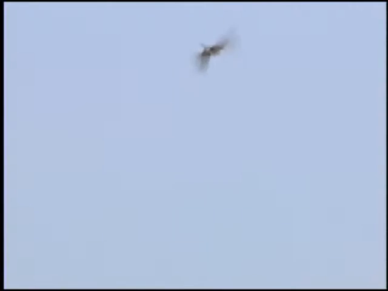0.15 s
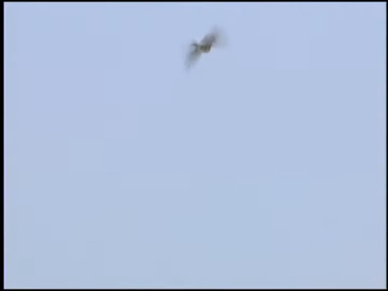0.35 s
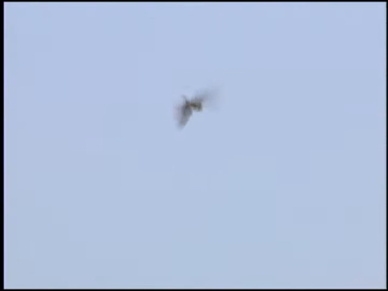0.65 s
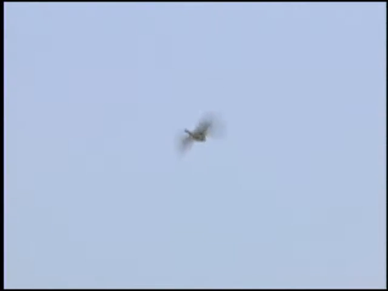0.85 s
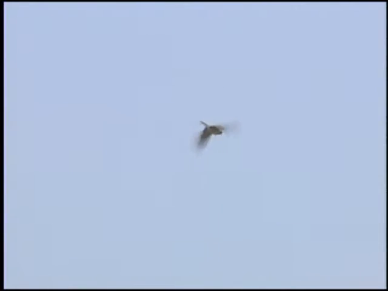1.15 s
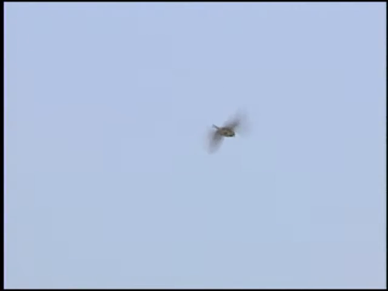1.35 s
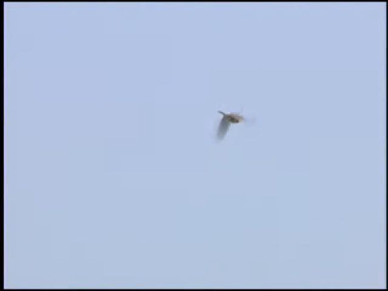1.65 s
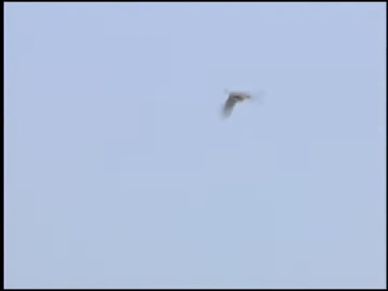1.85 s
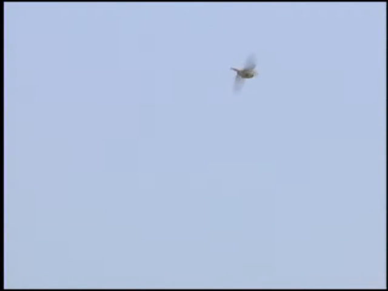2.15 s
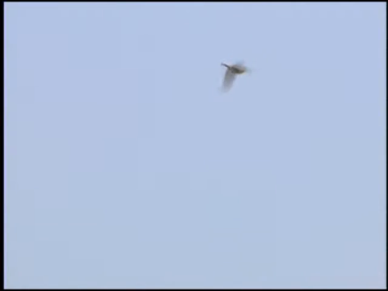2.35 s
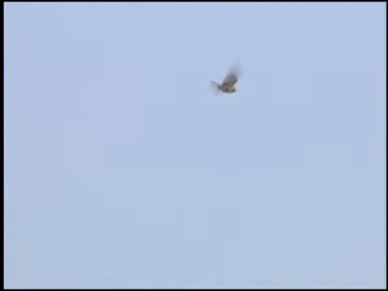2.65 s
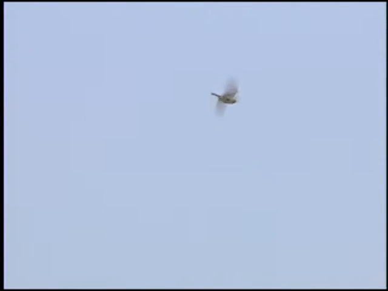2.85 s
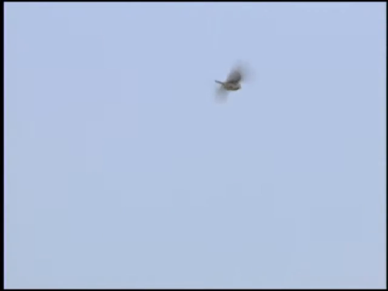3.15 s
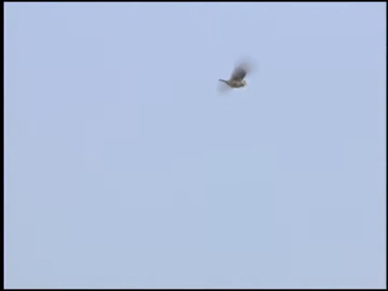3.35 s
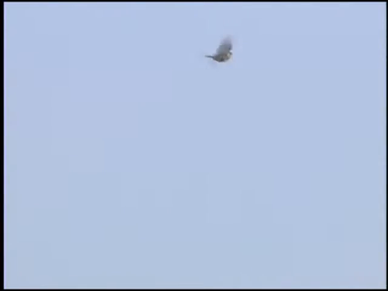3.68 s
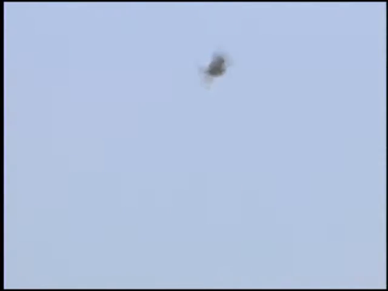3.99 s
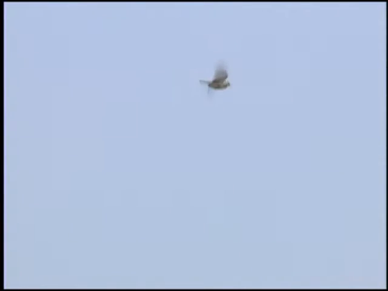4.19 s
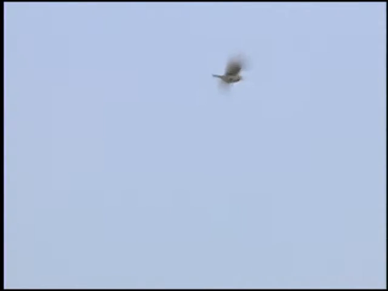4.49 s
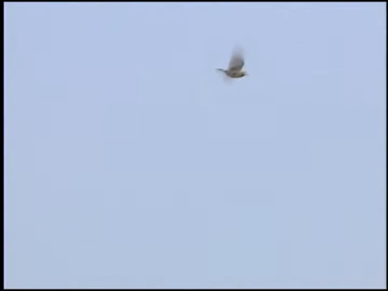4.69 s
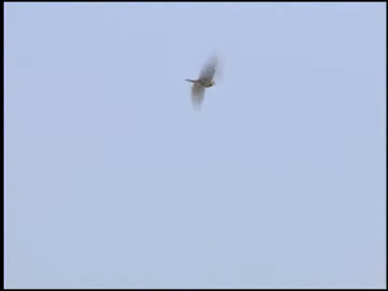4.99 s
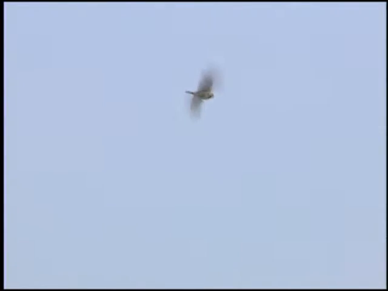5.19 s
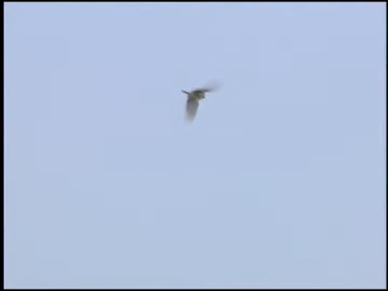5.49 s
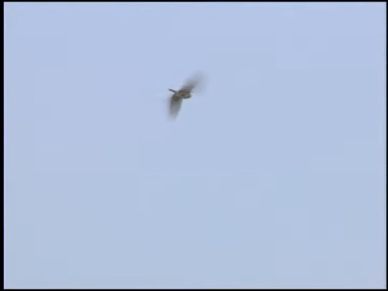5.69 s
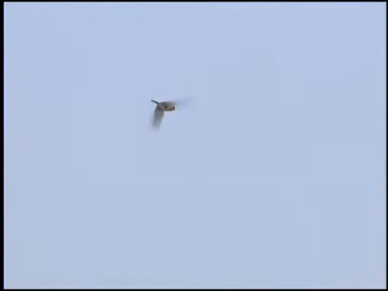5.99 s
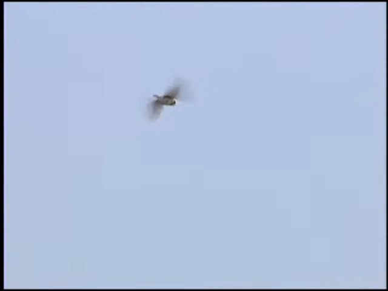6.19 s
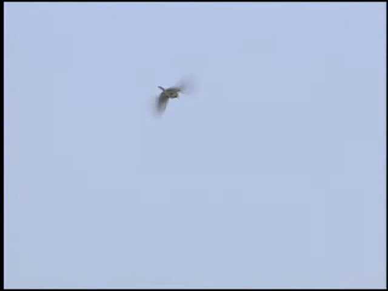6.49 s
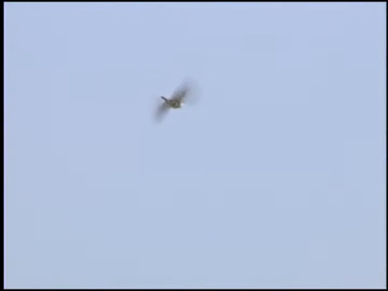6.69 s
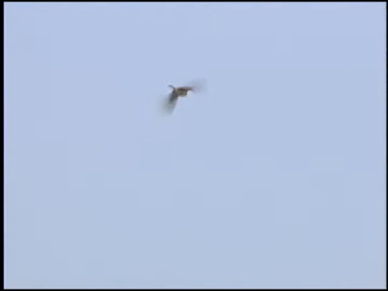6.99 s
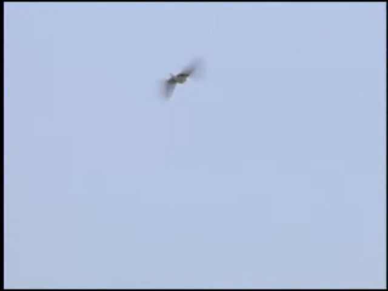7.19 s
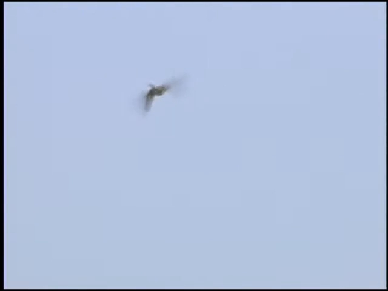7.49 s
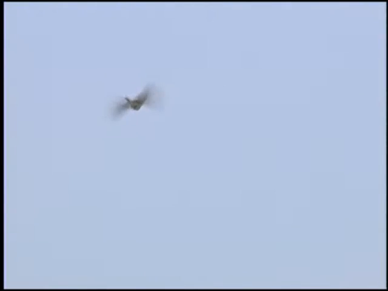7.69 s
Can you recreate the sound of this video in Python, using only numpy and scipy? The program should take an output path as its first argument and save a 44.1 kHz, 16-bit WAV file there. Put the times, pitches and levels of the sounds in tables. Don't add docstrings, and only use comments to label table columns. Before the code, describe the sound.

A lark in flight sings almost without pause: first a phrase of whistled slides, short trills and buzz, sung twice, then quick swooping phrases with pips and long rattling trills, repeated about every 0.7 seconds. Low wind rumbles against the camera microphone, swelling near five and seven seconds. Faint dull bangs roll far away, a second lark is barely audible, and soft hiss fills the open field.

```python
import sys
import numpy as np
from scipy import signal
from scipy.io import wavfile
from scipy.ndimage import uniform_filter1d

SR = 44100
rng = np.random.default_rng(int(sys.argv[2]) if len(sys.argv) > 2 else 0)


def voltage_ratio(level):
    return 10 ** (np.asarray(level, float) / 20)


def wrap_up_sound(samples):
    columns = np.atleast_2d(samples).T
    tamed = np.clip(columns, -1, 1)
    steps = np.round(tamed * 32767).astype(np.int16)
    wavfile.write(sys.argv[1], SR, steps)


N = 345744

# pitch_hz, level_db, width_hz, flutter_db
SCAN_LINES = [
    (7867, -99.5, 4, 1),
    (15201, -108, 30, 2),
    (15724, -85.5, 15, 4.6),
]
# frequency_hz, level_db
FIELD_SPECTRUM = [(60, -18.5), (140, -4.5), (250, -10), (400, -13), (750, -19), (1100, -24), (1600, -30),
                  (2200, -36), (3300, -40.5), (5000, -41.5), (6300, -46), (7200, -47.5), (11000, -49.5),
                  (16000, -45.5)]
# time_s, rumble_db
GUSTS = [(0.0, -39), (0.08, -45), (0.83, -39), (1.05, -50.5), (1.42, -40), (1.46, -47), (1.9, -40.5),
         (2.1, -48.5), (3.7, -52.5), (4.6, -42.5), (4.78, -35), (4.92, -41), (5.05, -31), (5.15, -43),
         (6.74, -33.5), (6.9, -45.5), (7.18, -39.5), (7.84, -36)]
# frequency_hz, level_db
RUMBLE_SPECTRUM = [(8, -19), (20, -3), (40, -4), (75, -4), (110, -12.5), (160, -20), (250, -34),
                   (400, -47.5), (900, -110)]
# middle_s, width_s, level_db
CROP_GUST = (7.31, 0.32, 4)
# pitch_hz, level_db, start_s, end_s
MACHINE = (754, -83.5, 2, 4.4)
# start_s, peak_db, time_to_fall_60_db_s, low_edge_hz, high_edge_hz
BANGS = [(.61, -68, 0.16, 400, 1750), (0.758, -56.5, 0.046, 400, 1980), (.995, -60, 0.057, 400, 1960),
         (1.195, -59.5, 0.041, 500, 2560), (1.452, -61, 0.11, 400, 1460), (2.143, -62.5, 0.15, 1200, 2630),
         (2.685, -72, 0.23, 900, 2760), (3.108, -59, 0.33, 450, 2220), (3.561, -55.5, 0.23, 450, 2240),
         (4.798, -67.5, 0.09, 2200, 3180), (4.996, -65, 1, 500, 1400), (5.385, -63, 0.15, 500, 2580),
         (5.983, -62.5, 0.33, 500, 2300), (6.461, -62.5, 0.3, 800, 2430), (4.65, -60, 0.17, 450, 790)]
# start_s, peak_db, pitch_hz, time_to_fall_60_db_s
KNOCKS = [(.762, -72, 1700, 0.027), (.997, -56, 700, .04), (1.013, -63, 750, .04), (1.197, -66, 810, .03),
          (1.455, -59, 696, .04), (3.109, -68, 1850, .03), (3.124, -62, 1140, .04),
          (3.561, -69, 1500, 0.036), (3.576, -62, 930, .04), (4.8, -73, 2770, .05),
          (5.977, -61, 2390, 0.054), (5.99, -71, 2320, .04), (6.121, -62, 1150, .04),
          (6.473, -66, 1690, .04), (6.493, -63.5, 1300, 0.047)]

# start_s, length_s, start_hz, end_hz, level_db
FAR_SLIDES = [(0.118, 0.019, 2090, 2900, -76.5), (.14, .14, 3270, 5500, -91),
              (0.917, .0093, 4460, 5170, -83), (1.204, .021, 2290, 2870, -78.5),
              (1.694, .03, 4200, 4920, -83), (1.725, .027, 6200, 4630, -85),
              (1.934, 0.015, 3170, 4130, -86), (3.592, .012, 4770, 4260, -78),
              (3.741, 0.013, 4960, 4300, -77), (4.715, 0.017, 5400, 4500, -77),
              (4.914, 0.02, 4350, 5000, -80), (4.972, .018, 2970, 3600, -81), (5.42, .022, 3500, 3000, -84),
              (5.885, .012, 5260, 4600, -85), (6.74, 0.054, 4300, 3800, -77),
              (1.105, .015, 5200, 4400, -89), (1.29, 0.0071, 4300, 4800, -85),
                (1.307, .008, 4700, 4000, -83), (1.315, 0.0091, 4500, 3800, -77),
                (1.675, .022, 3800, 4350, -87), (1.76, .045, 3100, 2750, -95),
                (1.945, .012, 4000, 2800, -90), (2.05, 0.034, 3850, 4700, -90),
                (2.549, 0.062, 3980, 3620, -88), (2.915, .04, 4010, 4400, -90),
                (3.365, 0.032, 3880, 4700, -93), (3.71, 0.016, 5150, 4850, -87),
                (4.72, 0.027, 2950, 3100, -89), (5.548, 0.018, 3400, 2890, -86),
                (5.615, .012, 5100, 4800, -83), (5.64, .12, 2550, 3200, -97), (5.845, .04, 5000, 3930, -85),
                (6.185, .02, 5000, 4500, -86), (6.4, .04, 4170, 4750, -89), (6.462, 0.047, 4200, 3880, -83),
                (6.835, 0.053, 2650, 2500, -85), (7.025, .03, 3200, 3500, -90),
                (7.232, .01, 4600, 4900, -82), (7.378, 0.018, 5200, 4370, -90),
                (7.408, .013, 4800, 5070, -85),
              (.497, .018, 2720, 2980, -86), (.578, .03, 3100, 2700, -87), (.678, .013, 4270, 4970, -83),
             (.7, .02, 3900, 3250, -87), (.889, .01, 5200, 4850, -87), (4.79, .01, 5000, 5500, -85),
             (4.802, .014, 5200, 4500, -84), (4.828, .01, 3800, 4500, -87), (4.846, .008, 3500, 4000, -88),
             (4.866, .008, 3100, 3500, -89), (4.954, .012, 3300, 3950, -85), (4.994, .01, 2900, 3500, -87),
             (5.002, 0.011, 4600, 4750, -78), (5.016, .01, 5000, 4900, -79)]
# start_s, length_s, top_hz, end_hz, level_db
FAR_ARCS = [(3.688, .014, 5200, 4700, -77), (0.77, 0.077, 4330, 4140, -83), (1.337, .03, 4000, 3500, -86),
            (4.934, .015, 4300, 4200, -81), (5.684, 0.018, 4300, 4200, -87),
            (5.743, 0.033, 4780, 4230, -81), (5.895, 0.026, 4330, 3850, -82.5),
            (6.213, 0.022, 2890, 2800, -84), (6.231, .024, 4600, 4370, -85), (7.216, 0.1, 3400, 3100, -84)]
# time_s, pitch_hz, level_db
FAR_CLIMB = [(0, 3150, -96), (.015, 3700, -88), (.03, 4150, -86), (.055, 4330, -87), (.08, 4330, -85),
             (.088, 4280, -95)]
FAR_WAIL = [(0, 3030, -91), (.015, 3200, -78), (.045, 3400, -81), (.06, 3410, -82), (.075, 3070, -82),
            (.115, 2570, -98)]
# start_s, level_change_db
FAR_WAILS = [
    (6.833, -1.5),
    (7.596, -1.5),
]

# time_s, pitch_hz, level_db
ARCH = [(.004, 5300, -87), (.007, 5390, -72), (.011, 5570, -68), (.017, 6030, -72.5), (.0225, 6900, -82.5)]
SWOOP = [(.037, 7140, -92), (.044, 6590, -71), (.06, 5410, -66.5), (.078, 4375, -64.5), (.088, 3970, -62.5),
         (.095, 3836, -66), (.098, 3760, -77)]
STEP_UP = [(.004, 5050, -82), (.008, 5280, -73), (.012, 5800, -73), (.017, 7060, -90)]
STEP_DOWN = [(.017, 7060, -87), (.024, 5600, -72.5), (.032, 5150, -66.5), (.047, 4870, -74),
             (.055, 4380, -64.5), (.064, 3650, -67.5), (.074, 3450, -65), (.1, 3370, -64.5),
             (.1035, 3420, -86)]
TENT = [(0.003, 3220, -78), (0.008, 3820, -62.5), (0.013, 4330, -73), (0.015, 4720, -75),
        (0.022, 4260, -61), (0.031, 3500, -66), (0.035, 3520, -84)]
SLIDE_DOWN = [(0.001, 5250, -76), (.005, 4860, -70), (0.01, 4500, -62.5), (0.018, 3750, -71)]
DOT = [(0.002, 3432, -79), (0.005, 3750, -64.5), (0.009, 3700, -73), (0.011, 3570, -93), (0.014, 2500, -88),
       (0.017, 2760, -72.5), (0.02, 2410, -86)]
PIP = [(.0015, 2700, -80), (.0033, 3150, -65), (.005, 3290, -61.5), (.0066, 3080, -65), (.0086, 2600, -79)]
HOOK = [(.004, 4250, -82), (.006, 4480, -70), (.011, 5000, -67), (.015, 5320, -68), (.0168, 5100, -79),
        (.0185, 4740, -66), (.022, 4420, -62.5), (.03, 3950, -61.5), (.034, 3880, -71)]
FALL = [(.029, 3050, -69), (.033, 3230, -63), (.0362, 3180, -67), (.038, 2780, -80), (.041, 2620, -69.5),
        (.045, 2530, -71), (.0468, 2330, -88), (.05, 2200, -76), (.056, 1900, -86)]
LEAD = [(.002, 5600, -85), (.006, 5270, -64.5), (.011, 4500, -68), (.0145, 3860, -69)]
# start_s, level_change_db
ARCH_TIMES = [(1.8983, -1), (2.033, -0.5), (2.6206, 0), (2.7506, 0.5), (3.333, 0.2), (3.464, 1.2),
              (4.0475, -1), (4.178, 0.9), (4.7745, 2.5), (4.906, 2.5), (5.495, -2), (5.63, -6.5),
              (6.234, -1.5), (6.366, -1), (6.9703, -1), (7.1015, 1.5), (7.7125, -2)]
STEP_TIMES = [
    (0.518, 4.8),
    (0.673, 5.1),
    (1.5978, 1),
    (1.7507, 1.1),
]
TENT_TIMES = [
    (0.0473, 0),
    (1.132, -5),
]
SLIDE_TIMES = [
    (0.291, -7),
    (1.374, -9),
]
DOT_TIMES = [
    (.234, 0.21),
    (1.3177, 0.4),
]
# start_s, level_change_db, pitch_share
CHIPS = [
    (0.829, -7, 0.92),
    (0.8375, -3.5, 0.93),
    (0.846, -7, 0.87),
    (0.866, -4, 0.99),
    (0.875, -7, .93),
]
# start_s, length_s, start_hz, end_hz, level_db
FLOURISH = [
    (.927, 0.013, 3600, 4700, -69.5),
    (0.938, 0.018, 4380, 3200, -70),
    (0.956, 0.0255, 2570, 3140, -73),
    (0.984, 0.0073, 4100, 3150, -69),
    (0.988, 0.019, 3950, 3600, -69),
    (1.009, 0.0096, 2800, 2400, -78),
]
# start_s, hook_db, pips_db, chup_db, gap_between_pips_s
CLOSES = [(2.17, 1, -0.5, -0.5, .0195), (2.885, 0.3, -1, 1, 0.018), (3.6, 0, 0, -1, .0208),
          (4.3145, 1.5, 0, 0.5, .0192), (5.041, 3.5, 2, 2, .0188), (5.768, -7, -4.5, -3, .019),
          (6.504, -3, -3, -1, .0188), (7.241, -1.5, 2, 2, .019)]
# lead_start_s, lead_db, trill_length_s, settled_beat_s, trill_db
LONG_TRILLS = [(2.347, 1.5, .1765, .01255, -1), (3.063, 2, .175, .01244, -.2),
               (3.7755, -3, .177, .0126, -2.5), (4.4933, -1, .185, .0126, 1.5),
               (5.218, -.5, .187, .01258, 0), (5.947, -9, .185, .0125, -6),
               (6.6825, -3.5, .19, .01253, -3.5), (7.4203, -5, .191, .0126, -2)]
TRILL_PITCH = [1.003, 1, 1, .995, .997, .989, .99, .974]
# share_of_beat, pitch_offset_hz, level_db
FLICK_BEAT = [(0, -820, -6.5), (.11, -820, -14), (.19, 800, -12.5), (.29, 360, -6), (.4, 20, -2),
              (.64, -30, 0), (.79, 320, -4), (.89, -520, -5), (1, -820, -6.5)]
SWING_BEAT = [(0, -850, -13), (.15, 1250, -24), (.24, 1000, -4), (.42, 130, -1.5), (.56, -20, 0),
              (.71, 280, -6), (.81, 1080, -.5), (.91, 1230, 1), (1, -850, -13)]
HOP_BEAT = [(0, -750, -15), (.3, -100, -3), (.5, 60, 0), (.7, -100, -3), (1, -750, -15)]
THROB_BEAT = [(0, -150, -22), (.5, 30, 0), (1, -150, -22)]
DIP_BEAT = [(0, -750, -7), (.25, -70, -1), (.5, 30, 0), (.75, -130, -1), (1, -750, -7)]
# share_of_length, pitch_hz, level_db, beat_depth (0 to 1)
LONG_CARRIER = [(0, 5500, -76, .05), (.014, 5260, -62, .1), (.032, 5020, -61, .3), (.048, 4780, -61, 1.05),
                (.13, 4610, -61, 1), (.4, 4520, -60, 1), (.9, 4420, -61, 1), (.98, 4400, -64, 1),
                (1, 4400, -74, 1)]
SHORT_CARRIER = [(0, 4800, -78, .1), (.06, 4450, -66, .3), (.14, 4250, -68, .8), (.9, 4050, -70, .8),
                 (1, 4050, -80, .8)]
WAVE_CARRIER = [(0, 4150, -82, .6), (.15, 4300, -72, 1), (.85, 4280, -69, 1), (1, 4400, -78, .9)]
BUZZ_CARRIER = [(0, 2950, -85, 0.77), (.2, 3010, -71, 0.93), (.8, 2910, -72, 0.92), (.92, 2660, -77, 0.5),
                (1, 2720, -67, 0.25)]
RISE_CARRIER = [(0, 3340, -96, .95), (.2, 3060, -69.5, 0.8), (.5, 3230, -68, 0.28), (.82, 3690, -68, 0.011),
                (.87, 3740, -77, 0.0082), (.93, 3060, -72, 0.0089), (1, 2790, -87, .01)]
CHUP_CARRIER = [(0, 3560, -66, .7), (.07, 3620, -62, .9), (.4, 3670, -62, .9), (.65, 3640, -62, .75),
                (.9, 3540, -62.5, .65), (1, 3350, -66, .65)]


def evened(x):
    return x / np.sqrt(np.mean(abs(x) ** 2) + 1e-20)


def read(points, hz):
    f, value = np.transpose(points)
    return np.interp(np.log(hz + 1), np.log(f + 1), value)


def add(mix, s, sound):
    start = round(s * SR)
    part = mix[max(start, 0):][:len(sound) + min(start, 0)]
    part += sound[max(-start, 0):][:len(part)]


def drift(count, size):
    once = uniform_filter1d(rng.standard_normal(count), size)
    return evened(uniform_filter1d(once, size))


def noise(level_db, patchy_db, size):
    frames = 4 * N // size + 5
    hz = np.fft.rfftfreq(size, 1 / SR)[:, None]
    t = np.arange(frames) * size / 4 / SR
    a, b, patches = rng.standard_normal((frames, len(hz), 3)).T
    patches = uniform_filter1d(patches, size=8, axis=0)
    patches = evened(uniform_filter1d(patches, size=6, axis=1))
    db = level_db(hz, t) + patchy_db * patches / (1 + (hz / 6000) ** 2)
    return signal.istft((a + 1j * b) * voltage_ratio(db), nperseg=size, noverlap=3 * size // 4)[1][:N]


def whistle(hz, db, flutter_db=1):
    count = len(hz)
    hz = uniform_filter1d(hz, size=20, mode="nearest") * (1 + .003 * drift(count, size=30))
    db = uniform_filter1d(db, size=20, mode="nearest") + flutter_db * drift(count, size=90)
    tone = np.sin(2 * np.pi * np.cumsum(hz) / SR)
    return np.sqrt(2) * voltage_ratio(db) * tone * signal.windows.tukey(count, min(80 / count, 1))


def slur(length, start_hz, middle_hz, end_hz, db, flutter_db):
    u = np.linspace(0, 1, round(length * SR))
    curve = np.polyval(np.polyfit([0, .5, 1], [start_hz, middle_hz, end_hz], 2), u)
    return whistle(curve, db + 0 * u, flutter_db) * signal.windows.tukey(len(u), .35)


def slide(length, start_hz, end_hz, db, flutter_db):
    midway = min(.6 + 3.5 * length, .84) if end_hz > start_hz else .5
    middle_hz = start_hz + midway * (end_hz - start_hz)
    return slur(length, start_hz, middle_hz, end_hz, db, flutter_db)


def syllable(shape, db, pitch=1):
    s, hz, level_db = np.transpose(shape)
    t = np.arange(s[0], s[-1], 1 / SR)
    level_db = 40 * np.log10(np.interp(t, s, voltage_ratio(level_db / 2)))
    sung = whistle(pitch * np.interp(t, s, hz), level_db + db, flutter_db=.6)
    return np.r_[np.zeros(round(s[0] * SR)), sung]


def trill(carrier, beat, length, db, beat_s, hurry_s=0, settle_s=.062, first=0, pitch=1, slur_share=1):
    t = np.arange(round(length * SR)) / SR
    share_of_length, *columns = np.transpose(carrier)
    hz, level_db, depth = (np.interp(t / length, share_of_length, c) for c in columns)
    beats = np.cumsum(1 / (beat_s - hurry_s * np.exp(-t / settle_s))) / SR
    share = (first + beats + .03 * drift(len(t), size=300)) % 1
    share_of_beat, *columns = np.transpose(beat)
    bend_hz, dip_db = (np.interp(share, share_of_beat, c) for c in columns)
    depth = depth * (1 + .1 * drift(len(t), size=250))
    apart = np.minimum(slur_share + t / settle_s / 4, 1)
    return whistle(pitch * hz + depth * bend_hz, level_db + db + depth * dip_db * apart, flutter_db=1.7)


def line_scan():
    out, t = np.zeros(N), np.arange(N) / SR
    for hz, db, width_hz, flutter_db in SCAN_LINES:
        flutter = np.minimum(drift(N, size=900), 1) + .1 * (t - 4)
        cycles = hz * t + np.cumsum(width_hz * drift(N, size=600)) / SR
        out += np.sqrt(2) * voltage_ratio(db + flutter_db * flutter) * np.cos(2 * np.pi * cycles)
    return out


def field():
    t = np.arange(N) / SR
    lag_s = .071
    gust_db = uniform_filter1d(np.interp(t, *np.transpose(GUSTS)), round(lag_s * SR), mode="nearest")
    machine = np.clip(np.minimum(t - MACHINE[2], MACHINE[3] - t) / .4 + 1, 0, 1)
    middle_s, width_s, crop_db = CROP_GUST
    db = .23 * (gust_db - gust_db.mean())
    db += 2.5 * machine
    db += crop_db * np.exp(-((t - middle_s) / width_s) ** 2)
    db -= db.mean()

    def swell(hz, s):
        return read(FIELD_SPECTRUM, hz) + np.interp(s, t, db) / (1 + (hz / 2700) ** 4)

    return voltage_ratio(-66) * evened(noise(swell, 2.1, size=1024))


def wind():
    s, rumble_db = np.transpose(GUSTS)

    def steady(hz, t):
        return read(RUMBLE_SPECTRUM, hz) + 0 * t

    def gusty(hz, t):
        gust_db = np.interp(t, s, rumble_db)
        reach = .14 * (gust_db + 41) * np.clip(np.log2(hz / 90 + .029), 0, 1)
        return read(RUMBLE_SPECTRUM, hz) + gust_db + reach

    rumble = noise(gusty, 1.25, size=2048) / np.std(noise(steady, 0, size=2048))
    return rumble * voltage_ratio(.63 * drift(N, size=900) + .4 * drift(N, size=3500))


def machine_hum():
    hz, db, start, end = MACHINE
    out, count = np.zeros(N), round((end - start) * SR)
    tone = whistle(np.full(count, hz * 1.), db + 2 * drift(count, size=5000))
    add(out, start, tone * signal.windows.tukey(count, .4))
    return out


def bangs():
    out, t = np.zeros(N), np.arange(SR // 2) / SR
    for s, db, t60, low_hz, high_hz in BANGS:
        band = signal.butter(3, [low_hz, high_hz], "band", fs=SR, output="sos")
        burst = evened(signal.sosfilt(band, rng.standard_normal(len(t))))
        fade = voltage_ratio(-60 * t / t60) + voltage_ratio(-10 - 60 * t / (4 * t60))
        shape = fade * np.minimum(t / .004, 1)
        shape = shape * voltage_ratio(2.2 * drift(len(t), size=200))
        add(out, s, voltage_ratio(db - 7) * burst * shape)
    return out


def knocks():
    out, t = np.zeros(N), np.arange(SR // 8) / SR
    for s, db, hz, t60 in KNOCKS:
        wobble = np.cumsum(1 + .08 * drift(len(t), size=60)) / SR
        level = voltage_ratio(db - 60 * t / t60) * np.minimum(t / .0015, 1)
        add(out, s, level * np.sin(2 * np.pi * hz * wobble))
    return out


def ground_echoes(x):
    t60, delay_s, low_hz = .22, .0041, 4400
    t = np.arange(SR // 2) / SR
    hits = rng.choice([-1., 1.], len(t)) * (rng.random(len(t)) < .05)
    taps = hits * voltage_ratio(-60 * t / t60) * (t > delay_s)
    high_pass = signal.butter(3, low_hz, "high", fs=SR, output="sos")
    bright = signal.sosfilt(high_pass, taps / np.linalg.norm(taps))
    echoes = signal.hilbert(signal.fftconvolve(x, bright)[:N])
    return (echoes * np.exp(1.6j * drift(N, size=250))).real


def far_lark():
    out = np.zeros(N)
    for s, *note in FAR_SLIDES:
        add(out, s, slide(*note, flutter_db=1.5))
    add(out, .484, syllable(FAR_CLIMB, 0))
    for s, db in FAR_WAILS:
        add(out, s, syllable(FAR_WAIL, db))
    for s, length, top_hz, end_hz, db in FAR_ARCS:
        add(out, s, slur(length, .9 * top_hz, top_hz, end_hz, db, flutter_db=2.5))
    return out


def opening_trills(out):
    for s, db, late_s in [(0, 1, .0005), (1.0845, .91, .0022)]:
        add(out, s - .0075, trill(BUZZ_CARRIER, HOP_BEAT, .057, db, .0081, first=.05))
        add(out, s + .185, trill(RISE_CARRIER, THROB_BEAT, .04, db, .0044, first=.15))
        add(out, s + .316, trill(SHORT_CARRIER, FLICK_BEAT, .058, db, .009, first=.02, slur_share=.6))
        add(out, s + .379 + late_s, trill(WAVE_CARRIER, SWING_BEAT, .095, db, .017, first=.12))


def phrase_closes(out):
    pip_after_s, chup_after_s = .0408, .078
    for s, hook_db, pips_db, chup_db, gap_s in CLOSES:
        add(out, s, syllable(HOOK, hook_db))
        add(out, s + pip_after_s, syllable(PIP, pips_db))
        add(out, s + pip_after_s + gap_s, syllable(PIP, pips_db))
        chup = trill(CHUP_CARRIER, DIP_BEAT, .0275, chup_db, .0065, first=-.04)
        add(out, s + chup_after_s + .002, chup)
        add(out, s + chup_after_s, syllable(FALL, chup_db))


def long_trills(out):
    for (s, lead_db, length, beat_s, db), pitch in zip(LONG_TRILLS, TRILL_PITCH):
        add(out, s, syllable(LEAD, lead_db))
        sung = trill(LONG_CARRIER, FLICK_BEAT, length, db, beat_s, hurry_s=.00475,
                     first=-.15, pitch=pitch, slur_share=.8)
        add(out, s + .0245, sung)


def lark():
    out = np.zeros(N)
    for shape, times in [(ARCH, ARCH_TIMES), (SWOOP, ARCH_TIMES), (STEP_UP, STEP_TIMES),
                         (STEP_DOWN, STEP_TIMES), (TENT, TENT_TIMES), (SLIDE_DOWN, SLIDE_TIMES),
                         (DOT, DOT_TIMES)]:
        for s, db in times:
            add(out, s, syllable(shape, db))
    for s, db, pitch in CHIPS:
        add(out, s, syllable(PIP, db, pitch))
    for s, *stroke in FLOURISH:
        add(out, s, slide(*stroke, flutter_db=1))
    opening_trills(out)
    phrase_closes(out)
    long_trills(out)
    return out


def scene():
    background = line_scan() + field() + wind() + machine_hum() + bangs() + knocks()
    far, near = far_lark(), lark()
    echoes = voltage_ratio(-10.5) * ground_echoes(near + voltage_ratio(2) * far)
    return (background + far + echoes + near)[None]


def low_pass(x):
    return signal.sosfilt(signal.butter(12, 15780, fs=SR, output="sos"), x)


def record(dry):
    ceiling = .06
    return low_pass(ceiling * np.tanh(dry / ceiling))


dry = scene()
out = record(dry)
wrap_up_sound(out)
```